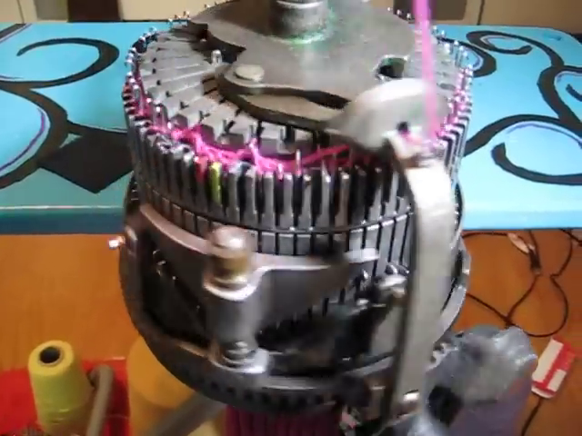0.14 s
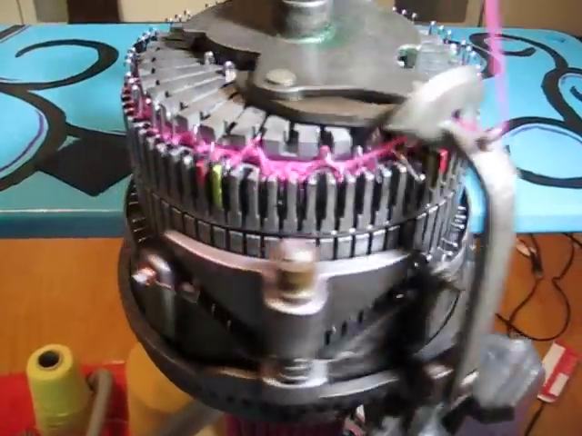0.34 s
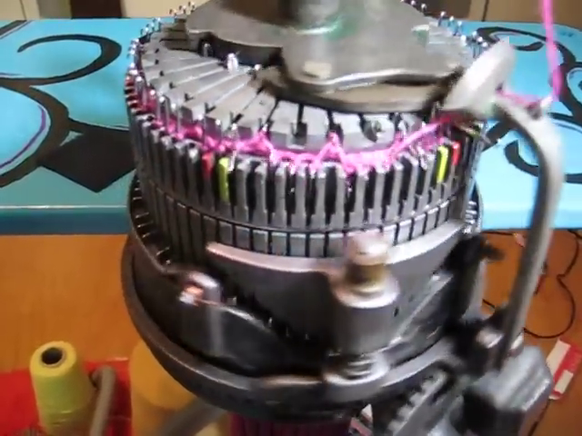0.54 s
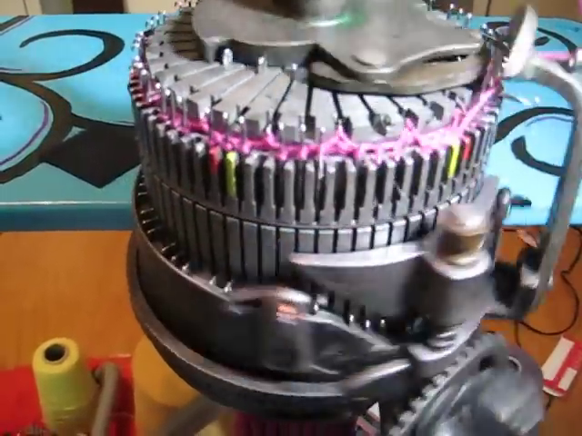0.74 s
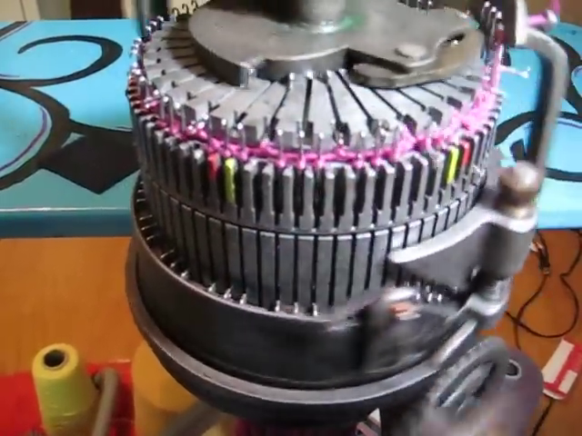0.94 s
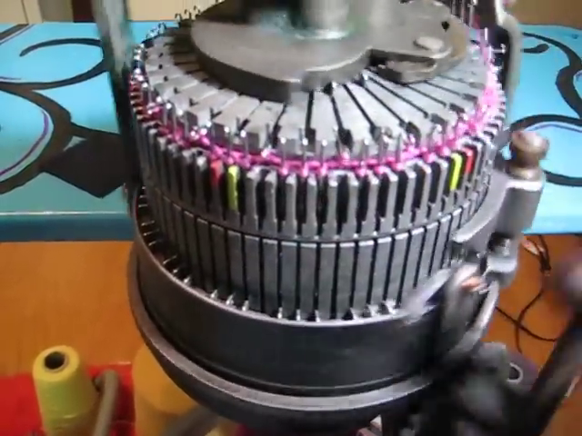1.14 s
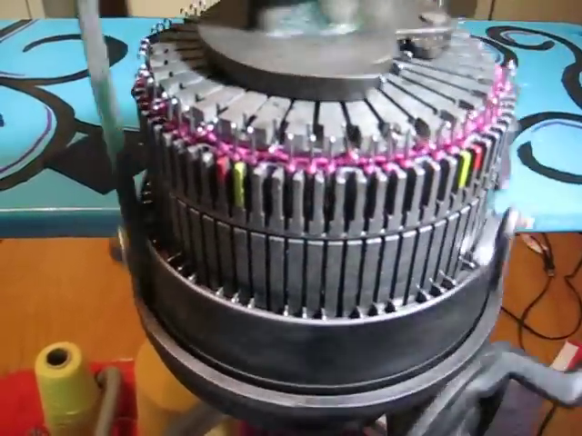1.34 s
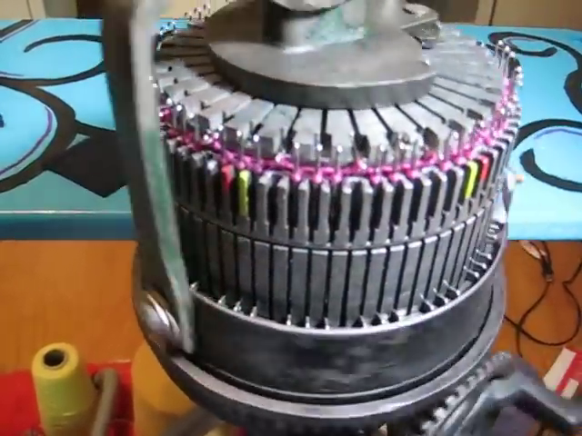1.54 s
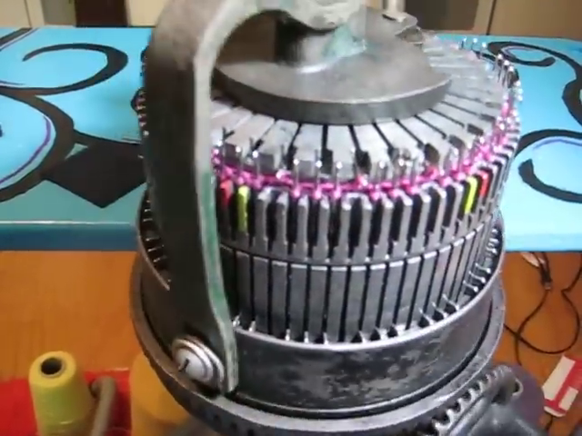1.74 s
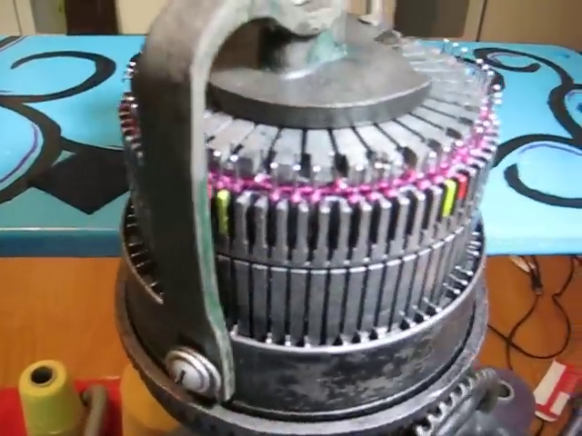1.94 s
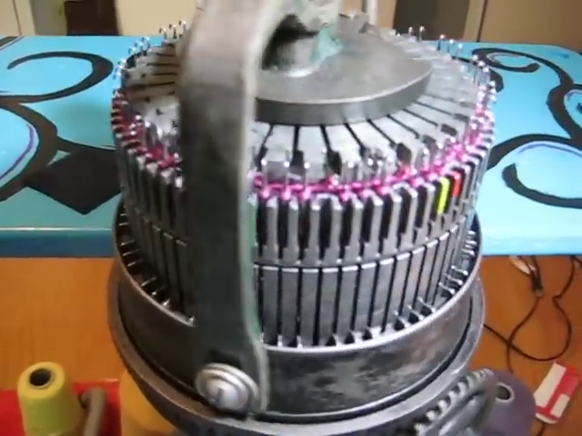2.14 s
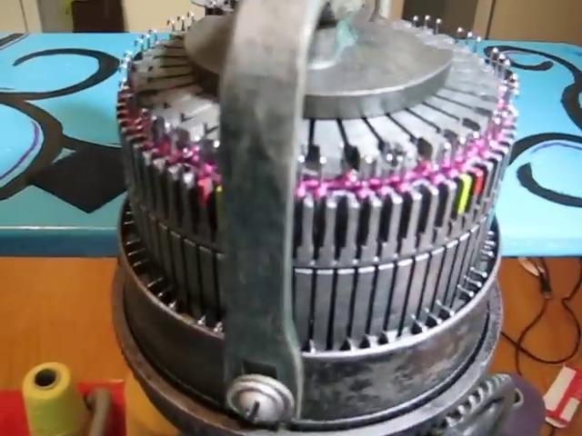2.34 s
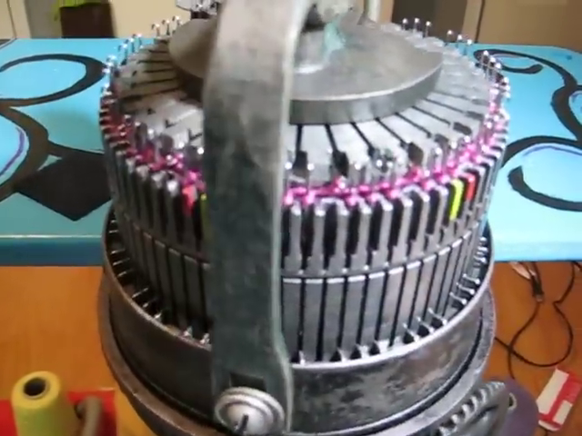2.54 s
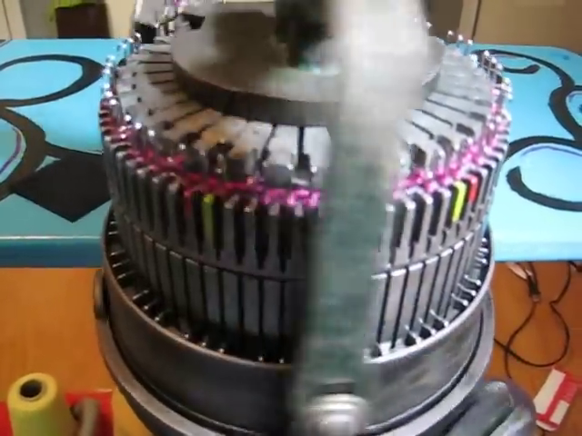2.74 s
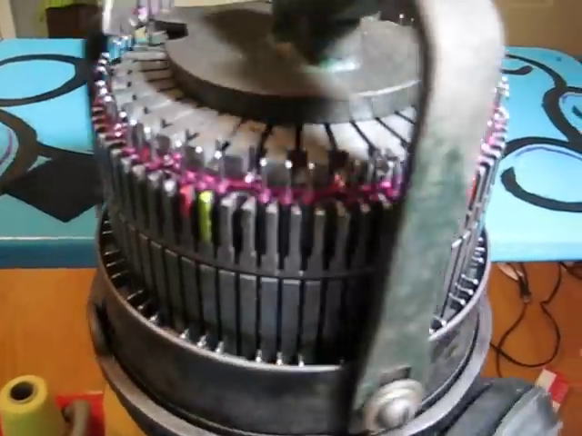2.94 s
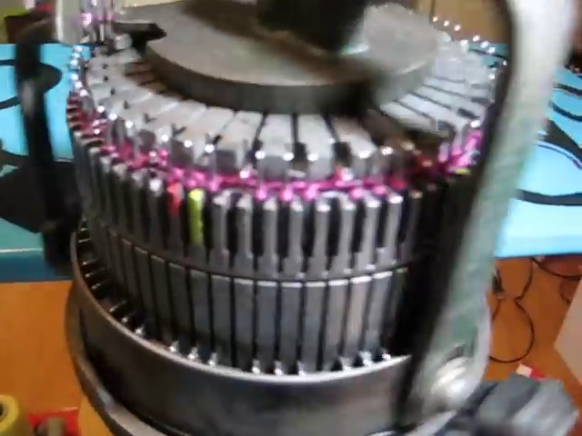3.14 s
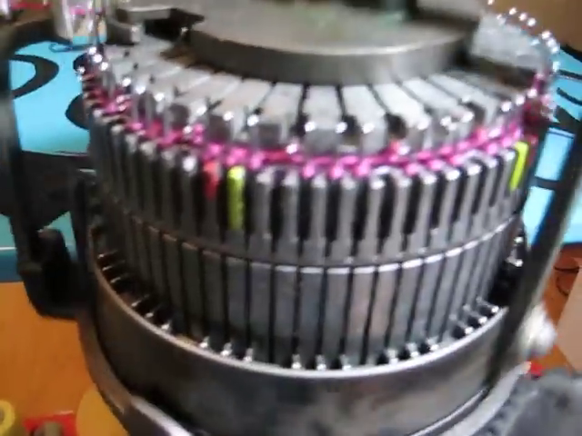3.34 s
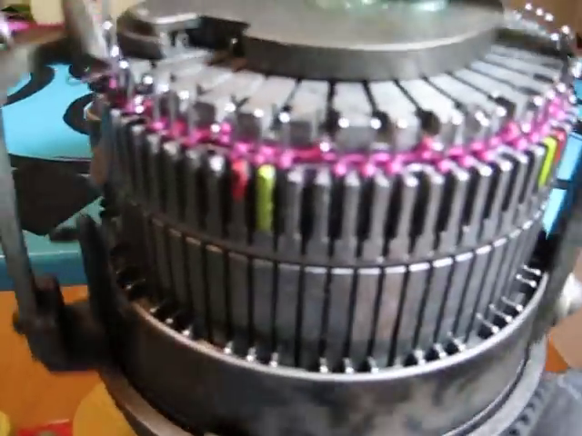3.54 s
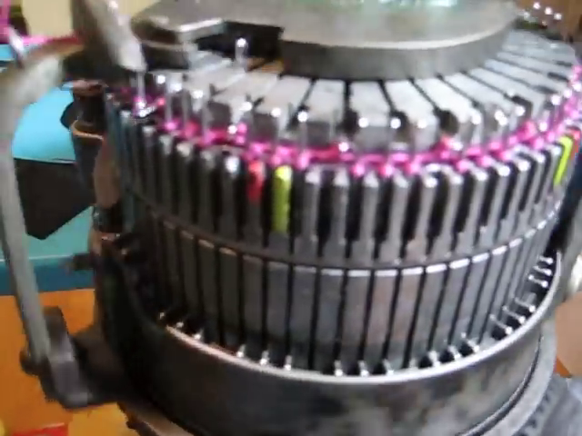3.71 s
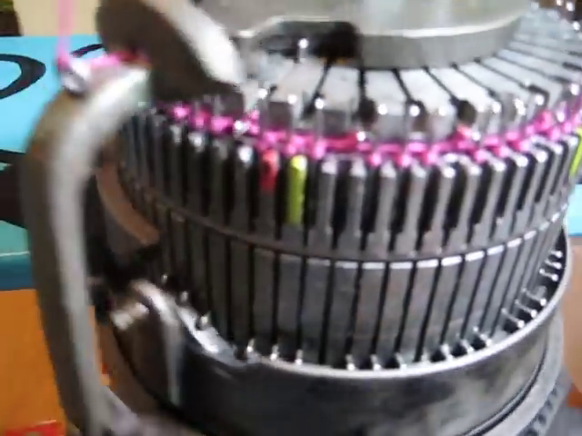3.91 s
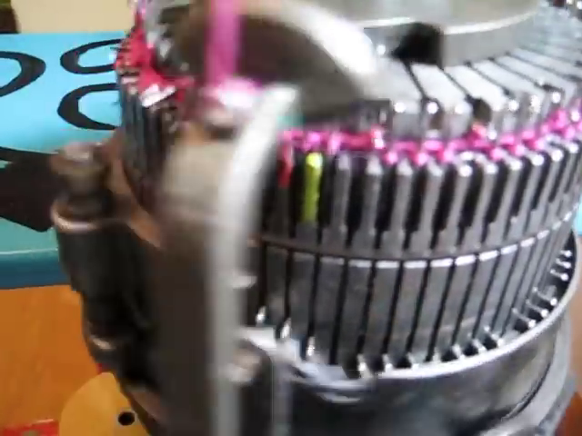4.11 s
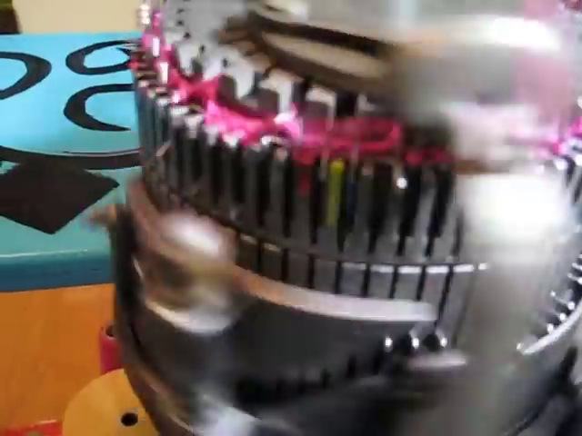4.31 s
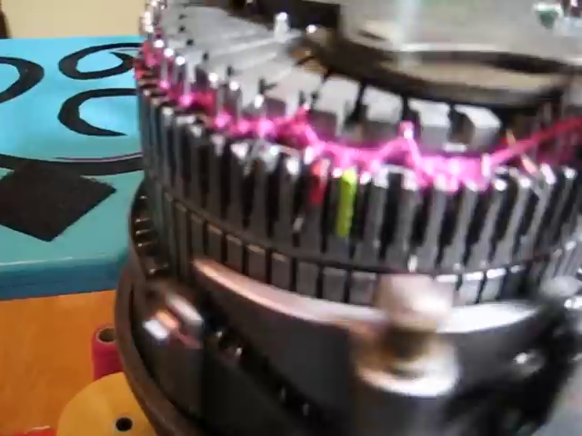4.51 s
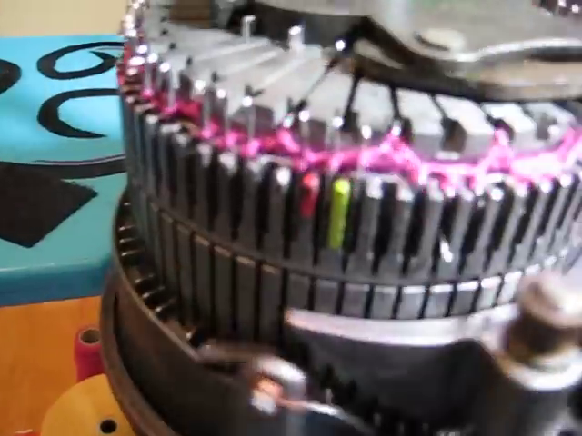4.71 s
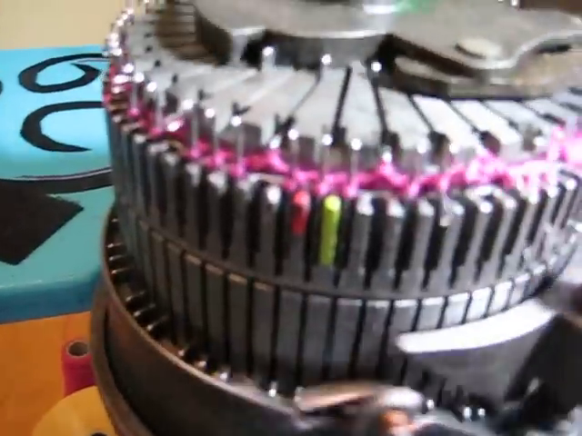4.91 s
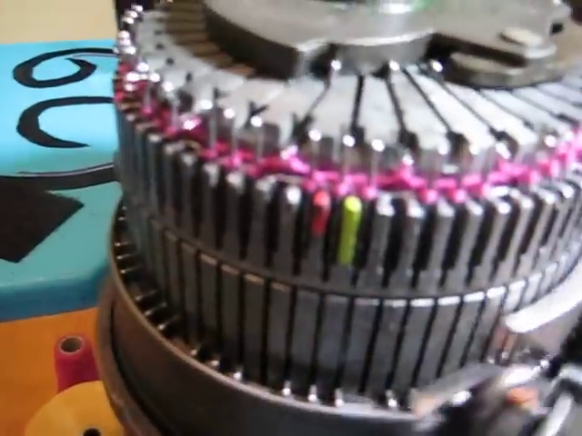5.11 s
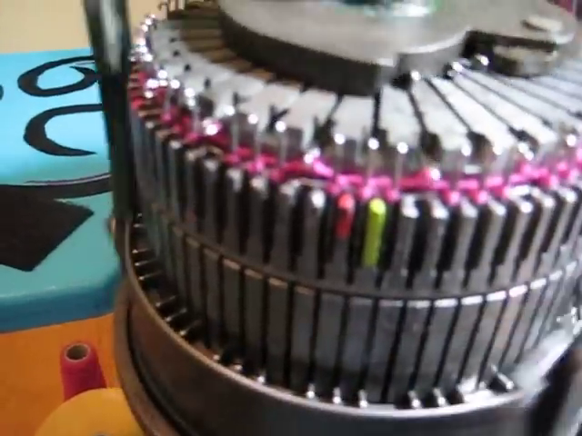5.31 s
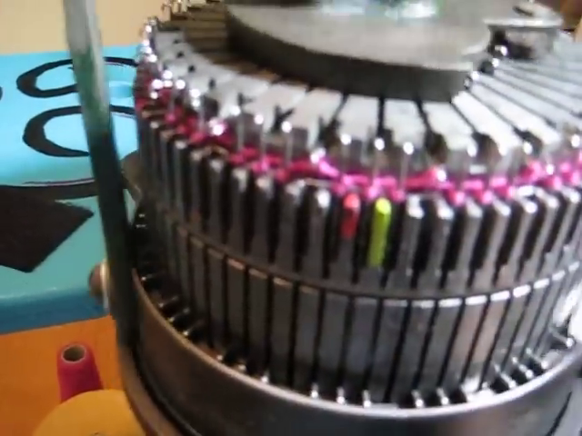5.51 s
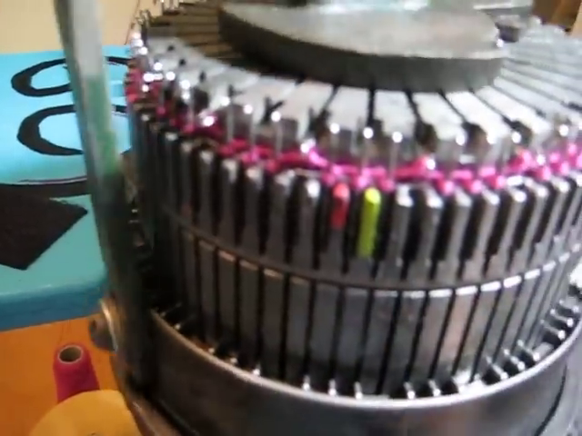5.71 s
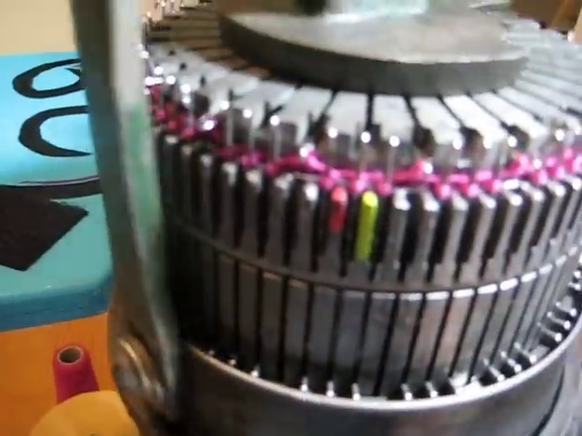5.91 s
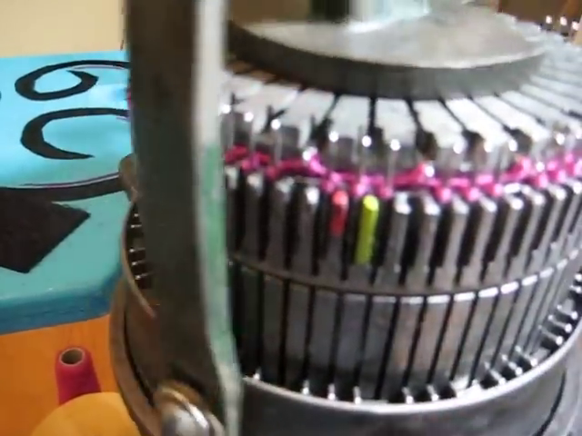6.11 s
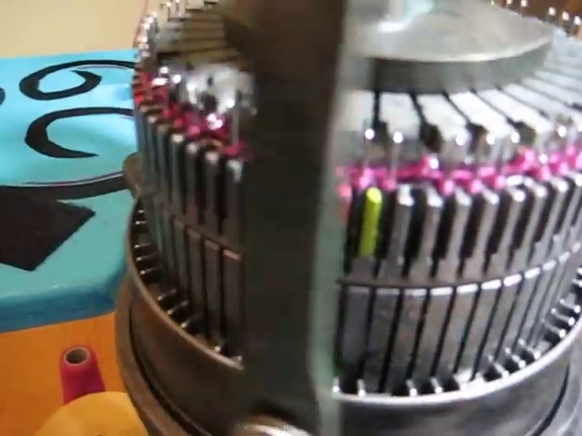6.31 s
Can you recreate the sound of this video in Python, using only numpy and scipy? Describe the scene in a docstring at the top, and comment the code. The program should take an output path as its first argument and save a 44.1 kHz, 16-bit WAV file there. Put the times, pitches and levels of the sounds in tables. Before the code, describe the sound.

A hand-cranked metal knitting machine clatters with dense needle clicks and gritty scraping, halts briefly, then restarts weakly and grows louder in a small room.

```python
"""A hand-cranked sock knitting machine turns in a small room; it halts briefly, with a weak start before it resumes.
Steel needles scrape along the cams with grit, ticks and tinkling, driven by the effort on the crank.
Needle butts knock on the cam shell, latches click as short damped bursts, and loose needles ping as narrow noise.
Gear teeth shake the stand in three modes, a few faint low thumps are heard, and the room answers softly.
Steady hum, a thin whine and coloured noise lie underneath and fill the pause."""
import sys
import numpy as np
from scipy import signal
from scipy.fft import rfft, irfft, next_fast_len
from scipy.io import wavfile

SR = 44100
rng = np.random.default_rng(int(sys.argv[2]) if len(sys.argv) > 2 else 0)


def int16_out(signal):
    """Quantize to a 16-bit WAV file."""
    q = np.round(np.clip(np.atleast_2d(signal).T, -1, 1) * 32767)
    wavfile.write(sys.argv[1], SR, q.astype(np.int16))


N = 280476
TIME_S = np.arange(N) / SR
BLOW_TIME_S = np.arange(SR // 10) / SR  # life of one blow

# steady drive of the crank on the needles: t/s, relative effort/dB
EFFORT = [(0, -35), (.42, -39), (.68, -31), (.88, -29), (1.1, -32), (1.38, -27), (1.65, -33.5), (1.77, -47),
          (1.92, -53), (1.99, -41), (2.22, -41), (2.31, -55), (2.66, -57), (2.8, -33), (3.0, -38),
          (3.3, -34.5), (3.64, -39), (4.1, -32), (4.39, -25), (4.6, -34), (4.85, -30), (5.15, -36),
          (5.3, -30), (5.56, -29), (5.66, -36), (6.03, -39), (6.36, -31)]
# spectrum of steel contact: f/Hz, relative level/dB
STEEL = [(100, -64), (400, -12), (700, -5.5), (1700, -7.5), (3000, -0.5), (6500, 0), (9000, -7),
         (16000, -49)]
# spectrum of needles rubbing on the cams: f/Hz, relative level/dB
SCRAPE = [(30, -67), (200, -28), (500, -7.5), (720, 0.5), (835, 4.5), (950, 1), (1300, -0.5), (1700, -7.5),
          (2400, 5), (3100, -6), (3600, 5), (4700, -7), (6400, -6), (15000, -26.5)]
# spectrum of the bright top of a snap: f/Hz, relative level/dB
SNAP = [(5000, -20.5), (8000, -7), (11000, 2.5), (16000, -6.5)]


def amp(db):
    """Decibels to gain."""
    return 10 ** (np.asarray(db) / 20)


def unit(x):
    """Scale to rms 1."""
    return x / np.sqrt(np.mean(x ** 2) + 1e-20)


def blow(x):
    """Scale a short sound to the energy of 5 ms at rms 1."""
    return x * np.sqrt(.005 * SR / np.sum(x ** 2))


def along(points, hz):
    """Interpolate (Hz, value) points on a log frequency axis."""
    f, value = np.transpose(points)
    return np.interp(np.log(hz + 1), np.log(f), value)


def curves(rows):
    """One value per sample for each column after the time."""
    s, *columns = np.transpose(rows)
    return np.array([np.interp(TIME_S, s, column) for column in columns])


def filtered(x, response):
    """Multiply the spectrum of x by a complex response of frequency."""
    size = next_fast_len(len(x) + len(x) // 10, real=True)
    hz = np.fft.rfftfreq(size, 1 / SR)
    return irfft(rfft(x, size) * response(hz), size)[:len(x)]


def resonance(f, hz, width_hz):
    """Causal response of one damped mode."""
    return 1j * f * width_hz / (hz * hz - f * f + 1j * f * width_hz)


def body(x, modes):
    """Play x through parallel damped modes."""
    return filtered(x, lambda f: sum(amp(db) * resonance(f, hz, width_hz) for hz, width_hz, db in modes))


def noise(spectrum, size):
    """Coloured noise of rms 1."""
    return unit(filtered(rng.standard_normal(size), lambda f: amp(along(spectrum, f))))


def fade(attack_s, t60_s):
    """Quick rise and exponential decay."""
    return (1 - np.exp(-BLOW_TIME_S / attack_s)) * amp(-60 * BLOW_TIME_S / t60_s)


def add(track, s, sound):
    """Mix a sound into the track at time s."""
    part = track[max(round(s * SR), 0):][:len(sound)]
    part += sound[:len(part)]


def scatter(size=None):
    """Even chance between -1 and 1."""
    return 2 * rng.random(size) - 1


def wobble(knots_per_s):
    """Random curve, linear between normally distributed knots."""
    return np.interp(TIME_S * knots_per_s, np.arange(400), rng.standard_normal(400))


def struck(spectrum, stretch):
    """Minimum-phase impulse response with the given spectrum, its frequencies scaled by stretch."""
    hz = np.fft.rfftfreq(len(BLOW_TIME_S), 1 / SR)
    level = amp(along(spectrum, hz / stretch))
    cepstrum = irfft(np.log(level), len(BLOW_TIME_S))
    # fold the cepstrum onto positive time
    cepstrum[1:] *= 2 * (BLOW_TIME_S[1:] < BLOW_TIME_S[-1] / 2)
    return irfft(np.exp(rfft(cepstrum)), len(BLOW_TIME_S))


def burst(colour, t60_s, strike=3.8):
    """One sharp contact and its quickly dying chatter, heard through an impulse response."""
    chatter = rng.standard_normal(len(BLOW_TIME_S)) * fade(.00005, t60_s)
    force = chatter + strike * (BLOW_TIME_S == 0)
    return blow(signal.fftconvolve(force, colour)[:len(BLOW_TIME_S)])


def effort():
    """Crank effort in dB: the steady drive plus a surge as the cams break loose."""
    # fresh starts: t/s, surge before rise and decay/dB
    starts = [(1.955, -35), (2.635, -12.5)]
    rise_s, t60_s = .09, .42
    surges = np.zeros(N)
    for s, db in starts:
        since_s = np.maximum(TIME_S - s, 0)
        rise = 1 - np.exp(-(since_s / rise_s) ** 2)
        surges += rise * amp(db - 60 * since_s / t60_s)
    return 20 * np.log10(amp(curves(EFFORT)[0]) + surges)


def passing(drive_db, level_db, count):
    """(s, dB) of needles meeting the cams one after another, unevenly; blows follow the effort."""
    stall_db = -52  # at or below this effort the blows all but vanish
    blow_law = .8  # dB of blow per dB of push
    at = ((np.arange(count) + rng.random(count)) / count * N).astype(int)
    push = np.maximum(amp(drive_db[at]) - amp(stall_db), 1e-6)
    push_db = 20 * np.log10(push / np.median(push))
    return np.transpose([at / SR, level_db + blow_law * push_db + 3 * scatter(count)])


def tinkle(rate_per_s, centre_hz, pitch_spread, t60_s, spread_db):
    """Many tiny steel contacts, each a damped tone at its own pitch; rms 1."""
    count = round(rate_per_s * N / SR)
    start = rng.integers(0, N, count)
    pitch, size = rng.standard_normal(count), rng.standard_normal(count)
    hz = np.clip(centre_hz * np.exp(pitch_spread * pitch), 1200, 12000)
    t = BLOW_TIME_S[:SR // 80]
    level_db = spread_db * np.clip(size, -2, 2)[:, None] - 60 * t / t60_s
    tones = np.sin(2 * np.pi * hz[:, None] * t) * amp(level_db)
    at = start[:, None] + np.arange(len(t))
    return unit(np.bincount(at.ravel(), tones.ravel(), N)[:N])


def sliding(drive_db, rub_db=-6.0, grit_db=-5.0, tinkle_db=-8, tick_db=-11):
    """Needles rub along the cams and jostle in their slots; tiny catches give grit and bright ticks."""
    catches_per_s, waver_db = 150, 1.2
    tick_knee_db, tick_growth = -29, 1.6  # tick dB per dB of steady effort about the knee
    drive = amp(drive_db + waver_db * wobble(knots_per_s=14))
    steady_db = curves(EFFORT)[0]
    tick_drive = amp(tick_knee_db + tick_growth * (steady_db - tick_knee_db))
    caught = rng.random(N) < catches_per_s / SR
    catches = caught * amp(4 * np.clip(rng.standard_normal(N), -2, 1.5))
    # overlapping catches add in power
    grains = np.sqrt(abs(signal.fftconvolve(catches ** 2, fade(.00005, 0.0094) ** 2)[:N]))
    grit = unit(grains * noise(STEEL, N))
    ticks = unit(grains * noise(SNAP, N))
    jostle = tinkle(rate_per_s=490, centre_hz=3400, pitch_spread=0.381, t60_s=0.019, spread_db=6)
    rub = amp(rub_db) * noise(SCRAPE, N)
    scrape = rub + amp(grit_db) * grit + amp(tinkle_db) * jostle
    return drive * scrape + tick_drive * amp(tick_db) * ticks


def gear(level_db=-1):
    """The crank's gear teeth shake the damped modes of the stand."""
    # rumble: t/s, relative level/dB
    rumble = [(0, -55), (.5, -54), (1.3, -43), (1.67, -48), (1.91, -61), (2.02, -42), (2.32, -65),
              (2.56, -62), (2.62, -52), (2.73, -40), (2.87, -52), (3.53, -54.5), (4.85, -48), (5.5, -51),
              (5.61, -59), (6.36, -46)]
    # gear and stand modes: f/Hz, width/Hz, relative level/dB
    stand_modes = [(270, 13, -12), (361.3, 20, 3), (540, 49, -6)]
    shaking = unit(body(rng.standard_normal(N), stand_modes))
    return amp(curves(rumble)[0] + level_db) * shaking


def background(air_db=-51.0):
    """Faint hum and a thin electronic whine as steady sines, over coloured noise."""
    # room hum: f/Hz, rms level/dB
    hum = [(119, -81), (240, -67), (334, -75)]
    # electronic whine: f/Hz, rms level/dB
    whine = [(7558, -74), (15149, -66)]
    # noise spectrum: f/Hz, relative level/dB
    air = [(15, -39), (25, -21), (82, -15.5), (120, -8), (174, -15.5), (241, -10.5), (291, -7.5),
           (3580, -20), (12100, -26.5), (14600, -21), (15800, -18)]
    tones = sum(amp(db) * np.sqrt(2) * np.sin(2 * np.pi * hz * TIME_S) for hz, db in hum + whine)
    return amp(air_db) * noise(air, N) + tones


def knocks(drive_db, rattle_db=-12, judder_db=-7, level_db=-9.5):
    """A needle butt hits the cam: a dull knock, a short judder of the shell and a thin rattle."""
    # hardest butts: t/s, relative level/dB
    hard_knocks = [(0.044, -13.5), (0.15, -22), (0.196, -19.5), (0.252, -18.5), (0.305, -18.5),
                   (0.457, -22), (0.483, -19.5), (0.536, -16), (0.597, -14), (0.703, -18), (0.782, -14.5),
                   (0.859, -14), (0.938, -15.5), (1.029, -20), (1.074, -19.5), (1.132, -14.5),
                   (1.284, -16.5), (1.41, -20), (1.65, -28), (1.734, -22.5), (1.797, -20), (1.987, -20.5),
                   (2.257, -19), (2.696, -12), (2.713, -15), (2.805, -18), (2.89, -14.5), (3.067, -22),
                   (3.103, -22), (3.188, -14), (3.295, -21.5), (3.342, -19.5), (3.376, -19.5),
                   (3.429, -16.5), (3.549, -23.5), (3.64, -19), (3.702, -17.5), (3.757, -18),
                   (3.888, -16.5), (3.986, -13.5), (4.08, -12), (4.186, -8.5), (4.249, -14.5), (4.263, -15),
                   (4.31, -15), (4.376, -12), (4.401, -18), (4.436, -12.5), (4.519, -15.5), (4.539, -13),
                   (4.575, -18), (4.73, -15), (4.783, -13), (4.89, -18), (4.991, -15), (5.09, -14),
                   (5.139, -21), (5.225, -15), (5.368, -19), (5.418, -16), (5.626, -14.5), (5.757, -18.5),
                   (5.847, -23), (5.924, -20.5), (6.094, -21), (6.126, -23), (6.283, -19), (6.338, -18)]
    # cast cam shell when struck: f/Hz, relative level/dB
    shell = [(25, -56), (150, -30.5), (470, -16), (640, -10.5), (790, 3.5), (1000, -2), (1280, -3),
             (1700, -11), (2700, -14), (4000, -18.5), (10000, -47)]
    delay_s = .001  # short fixed delay of every knock
    out = np.zeros(N)
    cam = struck(SCRAPE, 1)
    shudder = struck([(350, -31.5), (720, 0.5), (1250, -2), (2300, -3.5), (5000, -24)], 1)
    for s, db in [*hard_knocks, *passing(drive_db, level_db=-27, count=40)]:
        # each needle strikes another spot, so the colour shifts a little
        spot = [(hz, level + 2 * rng.normal()) for hz, level in shell]
        thud = blow(struck(spot, rng.uniform(0.98, 0.99)))
        judder = amp(judder_db) * burst(shudder, 0.041)
        rattle = amp(rattle_db) * burst(cam, 0.041)
        add(out, s + delay_s, amp(db + level_db) * (thud + judder + rattle))
    return out


def light_clicks(drive_db, centre_hz=4700, octaves=0.72, bright_db=-9, bright_spread_db=9):
    """Click rows for the lighter latches, each with its own pitch and brightness."""
    rows = []
    for s, db in passing(drive_db, level_db=-29.5, count=125):
        hz = centre_hz * 2 ** (octaves * scatter())
        rows.append((s, db, hz, bright_db + bright_spread_db * scatter()))
    return rows


def clicks(drive_db, ring_db=-3.0, crack_db=-1.2, snap_db=-.5, looseness_octaves=.8):
    """Steel on steel: a crack of many modes, one stronger resonance and a bright, brief snap."""
    # loudest latches and needles: t/s, relative level/dB, main resonance f/Hz, relative snap/dB
    loud_clicks = [(.0467, -23, 5600, 1), (.0694, -23, 4200, -8), (.1206, -23, 3880, -12),
                   (.1524, -23, 3640, -7), (.2544, -18, 4850, -11), (.2831, -17, 3300, -6),
                   (.3051, -23, 3440, -14), (.458, -19, 5150, -6), (.5218, -23, 6040, -5),
                   (.5381, -20, 4500, -12), (.5696, -20, 6200, -2), (.5995, -23, 4200, -8),
                   (.6778, -20, 6540, -6), (.7601, -20, 5270, 0), (.8597, -23, 5540, -7),
                   (.8818, -27, 5800, 9), (.9557, -22, 5370, -9), (1.0499, -23, 3800, -4),
                   (1.1006, -20, 5800, -3), (1.2661, -21, 5860, -1), (1.3969, -20, 3900, -4),
                   (1.4947, -22, 7160, -12), (1.512, -24, 5960, -1), (1.5515, -21, 7050, -6),
                   (1.6083, -22, 3500, -6), (1.6497, -23, 3750, -13), (1.8117, -24, 5800, -3),
                   (1.9381, -29, 6500, -12), (1.9737, -20, 7000, -5), (2.112, -31, 3600, -10),
                   (2.1558, -24, 3450, -18), (2.162, -28, 3400, -22), (2.214, -30, 4100, -6),
                   (2.2254, -30, 4080, -9), (2.6367, -27, 5650, 2), (2.6779, -21, 5360, -1),
                   (2.7136, -21, 3660, -19), (2.7409, -22, 5100, -18.5), (2.7981, -27, 6260, 2),
                   (3.0065, -23, 3400, -24), (3.1348, -26, 3400, -11), (3.1583, -21, 6300, -4),
                   (3.1919, -23, 3500, -12), (3.2642, -25, 6900, -26), (3.2962, -24, 5170, -8),
                   (3.3544, -28, 7800, 2), (3.3779, -23, 4500, -7), (3.4129, -20, 3460, -13),
                   (3.5499, -24, 4740, -27), (3.6092, -22, 6800, -6), (3.744, -22, 3630, -11),
                   (3.8538, -24, 4900, -14), (3.9133, -25, 5550, 1), (3.963, -18, 4700, -2),
                   (3.9872, -23, 6500, -9), (4.0592, -20, 3560, -2), (4.0812, -20, 4570, -5),
                   (4.1109, -24, 5700, 0), (4.1565, -24, 6900, -1), (4.1639, -20, 3450, -20),
                   (4.1901, -24, 4220, 2), (4.2174, -20, 3520, -23), (4.2499, -18, 3400, -5),
                   (4.2988, -19, 7040, -2), (4.3221, -23, 6700, -11), (4.402, -21, 4870, 0),
                   (4.4369, -20, 3650, -8), (4.4863, -21, 3280, -6), (4.4954, -19, 5500, -11),
                   (4.5416, -19, 3800, -4), (4.5611, -23, 6500, 4), (4.6178, -21, 6100, -4),
                   (4.6596, -18, 3470, -6), (4.6824, -18, 6900, -7), (4.7162, -24, 7800, 3),
                   (4.7314, -19, 4300, -8), (4.7539, -18, 7200, -3), (4.7859, -20, 4300, -17),
                   (4.804, -21, 3900, 0), (4.8648, -19, 3620, -7), (4.9129, -29, 3800, 10),
                   (4.9614, -20, 4100, 0), (4.9943, -21, 5600, -11), (5.0139, -19, 5800, -4),
                   (5.0626, -22, 3570, -4), (5.0921, -19, 3900, -7), (5.1293, -28, 5700, 7),
                   (5.2264, -22, 6200, -9), (5.3517, -31, 7800, 8), (5.3883, -19, 3830, -13),
                   (5.4239, -21, 6900, -14), (5.5098, -25, 6650, 0), (5.5386, -28, 5800, 6),
                   (5.7087, -23, 3630, -25), (5.7608, -23, 6200, -13), (5.8048, -31, 6050, 6),
                   (5.8943, -22, 6150, -3), (6.1119, -24, 5730, 1), (6.1819, -20, 6640, -5),
                   (6.2459, -24, 4240, -3), (6.2719, -23, 4300, -10), (6.3203, -23, 4340, -12)]
    out = np.zeros(N)
    steel, latch = struck(STEEL, 0.99), struck(SNAP, 0.95)
    for s, db, hz, bright_db in [*loud_clicks, *light_clicks(drive_db)]:
        damping = 2 ** (looseness_octaves * scatter())  # some needles sit tighter
        crack = amp(crack_db) * burst(steel, .017 / damping)
        mode = np.cos(2 * np.pi * hz * BLOW_TIME_S) * fade(0.000092, 0.013)
        ring = amp(ring_db) * burst(mode, .018 / damping)
        snap = amp(bright_db + snap_db) * burst(latch, 0.0086)
        add(out, s, amp(db) * (crack + ring + snap))
    return out


def low_thumps():
    """A few faint low thumps, each the impulse response of a bass-heavy spectrum."""
    # thumps: t/s, level over 5 ms/dB
    thumps = [(.76, -44), (4.3, -46), (4.389, -37), (4.961, -40)]
    out = np.zeros(N)
    for s, db in thumps:
        thump = struck([(20, -5), (60, -5), (130, -5), (400, -18)], 1)
        add(out, s, amp(db) * blow(thump))
    return out


def pings(mode_width_hz=560, gain_db=-1):
    """A loose needle rings in a narrow band, its pitch blurred as it chatters in the slot."""
    # freely ringing needles: t/s, relative level/dB, f/Hz, t60/s
    ringing = [(0.7998, -19.5, 3770, 0.025), (0.816, -21, 2330, 0.045), (1.106, -16.5, 3600, .05),
               (1.124, -22, 3340, .06), (1.6495, -19, 3260, .015), (2.6773, -20, 3320, 0.032),
               (2.726, -15.5, 3520, 0.13), (2.8745, -18, 2870, .05), (2.876, -13.5, 3640, .021),
               (2.929, -23.5, 5030, .038), (2.93, -18.5, 3620, 0.068), (3.684, -15.5, 5930, 0.017),
               (3.914, -27, 5600, 0.018), (4.8256, -19, 2340, 0.036), (5.42, -15, 3030, 0.022),
               (5.461, -22, 2250, 0.12), (5.543, -15.5, 2970, 0.062), (5.572, -19, 2190, .08),
               (5.587, -24, 3620, .037), (5.805, -19.5, 6050, 0.0078), (5.894, -18.5, 3500, 0.017)]
    out = np.zeros(N)
    for s, db, hz, t60_s in ringing:
        chatter = rng.standard_normal(len(BLOW_TIME_S))
        # two equal modes in series
        ring = filtered(chatter, lambda f: resonance(f, hz, mode_width_hz) ** 2)
        add(out, s, amp(db + gain_db) * blow(ring * fade(0.00012, t60_s)))
    return out


def room(x, gap_s=.011, count=16):
    """The walls answer after a short gap with decaying noise tails that crossfade steadily."""
    # reverberation: f/Hz, t60/s
    decay = [(300, 0.64), (3000, 0.15), (14000, 0.18)]
    out, turn = np.zeros(N), np.linspace(0, count - 1, N)
    for k in range(count):
        hz, t, bins = signal.stft(rng.standard_normal(SR // 2), SR, nperseg=256)
        decaying = bins * amp(-60 * t / along(decay, hz)[:, None])
        tail = signal.istft(decaying, SR, nperseg=256)[1]
        near = np.flatnonzero(abs(turn - k) < 1)
        part = x[near] * np.sqrt(1 - abs(turn[near] - k))  # equal-power crossfade
        add(out, near[0] / SR + gap_s, signal.fftconvolve(part, tail / np.linalg.norm(tail)))
    return filtered(out, lambda f: amp(along([(800, -3.5), (4000, -2.5), (12000, -2.5)], f)))


def scene():
    """The machine, its room and the still background."""
    drive_db = effort()
    steel = sliding(drive_db) + knocks(drive_db) + clicks(drive_db) + pings()
    # small steel parts radiate almost no bass
    needles = filtered(steel, lambda f: (1j * f / (1j * f + 55)) ** 2)
    machine = needles + gear() + low_thumps()
    return (machine + amp(-12.0) * room(machine) + background())[None]


def record(dry):
    """Steep zero-phase low-pass at the band limit."""
    top_hz = 15800
    return filtered(dry[0], lambda hz: 1 / (1 + (hz / top_hz) ** 160))[None]


dry = scene()
out = record(dry)
int16_out(out)
```